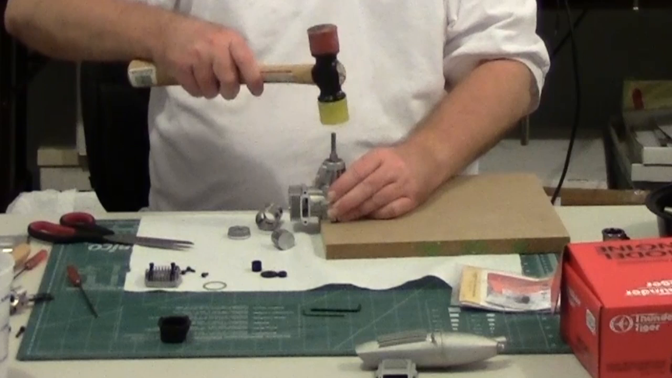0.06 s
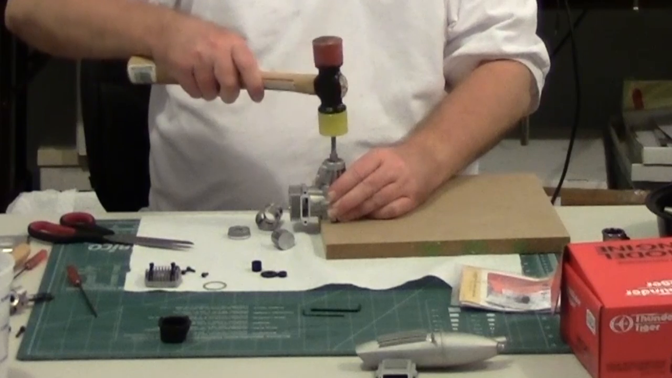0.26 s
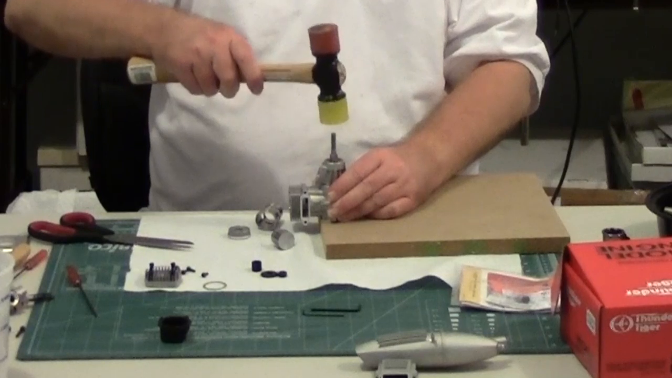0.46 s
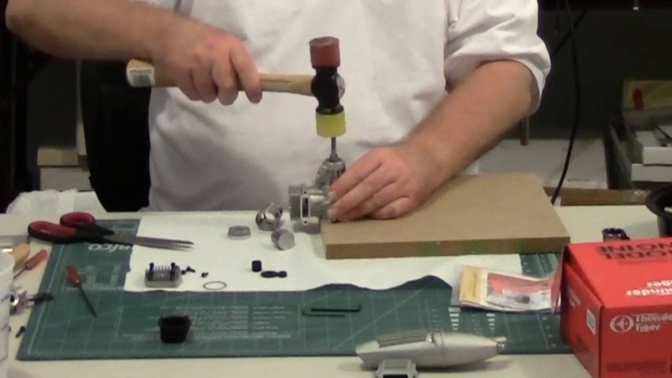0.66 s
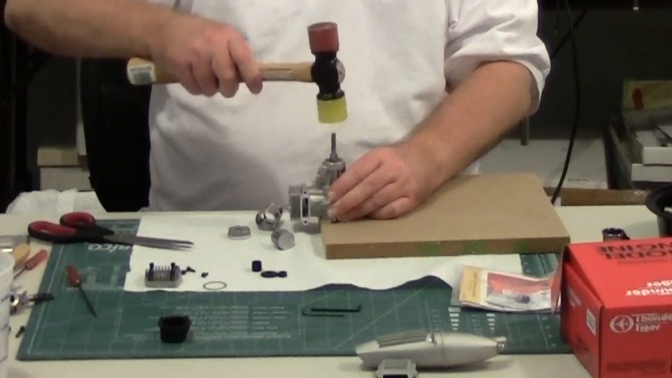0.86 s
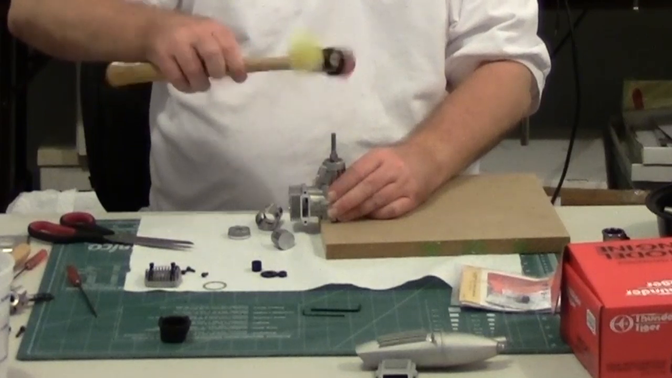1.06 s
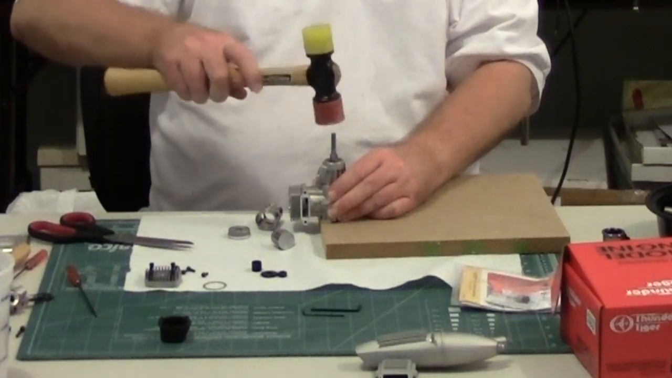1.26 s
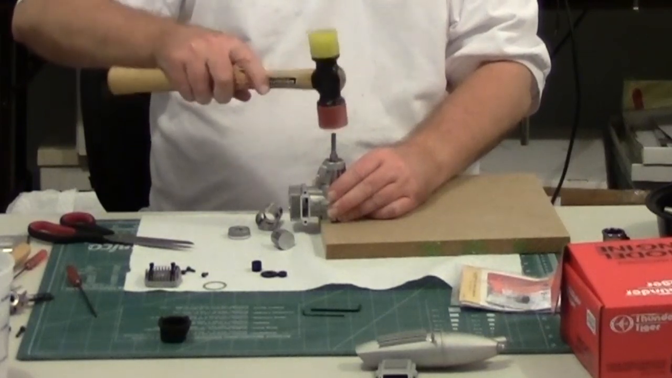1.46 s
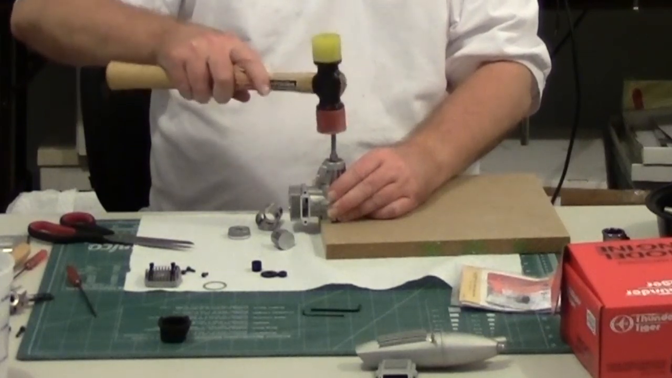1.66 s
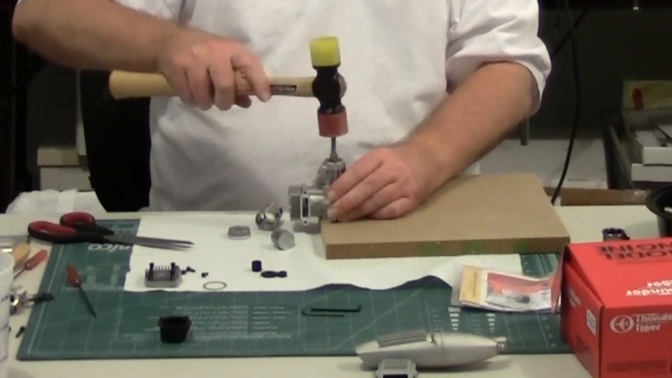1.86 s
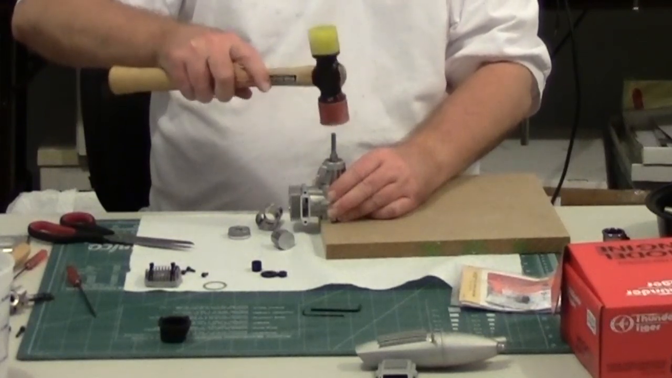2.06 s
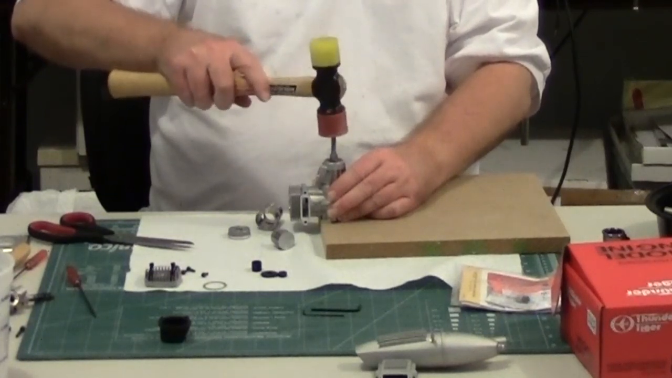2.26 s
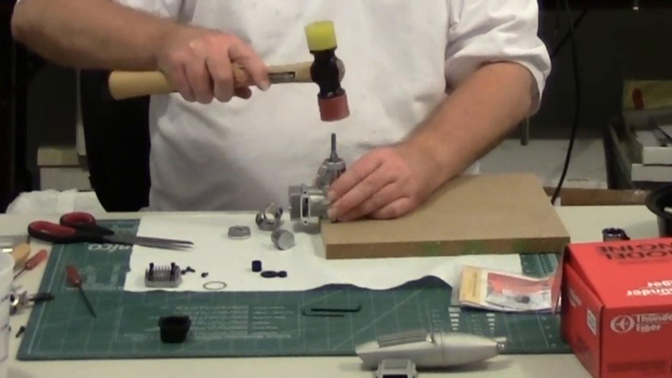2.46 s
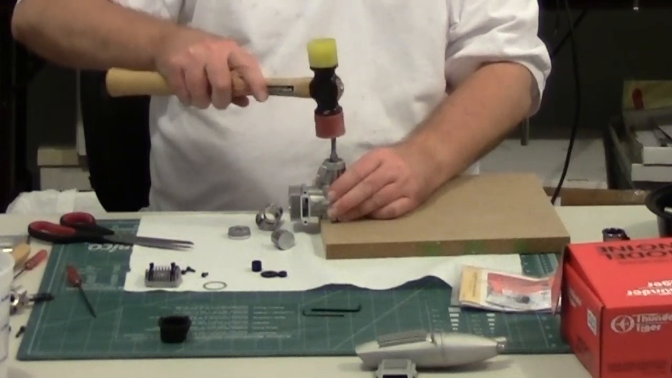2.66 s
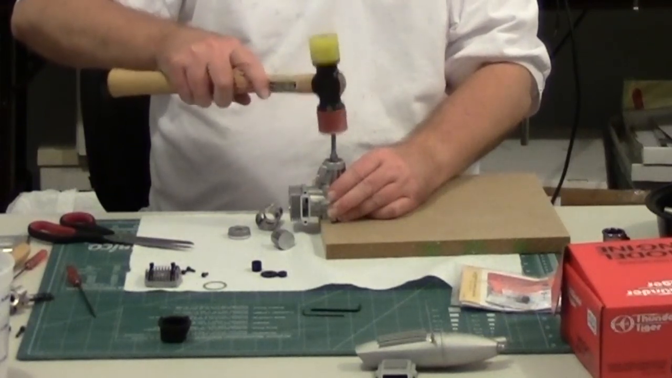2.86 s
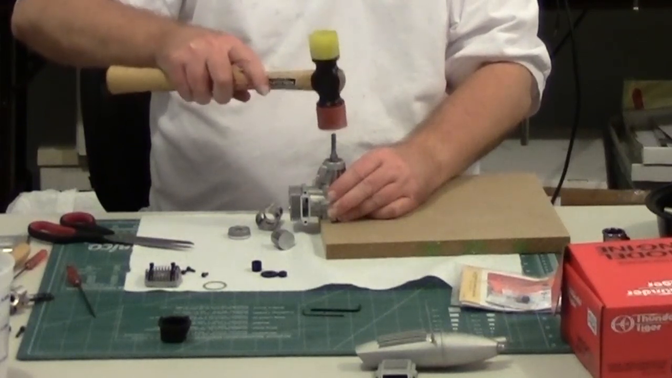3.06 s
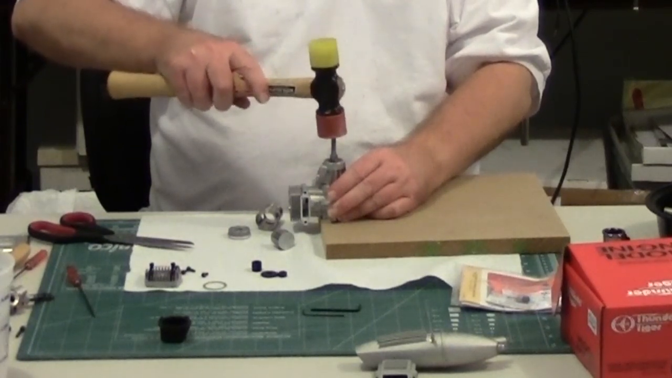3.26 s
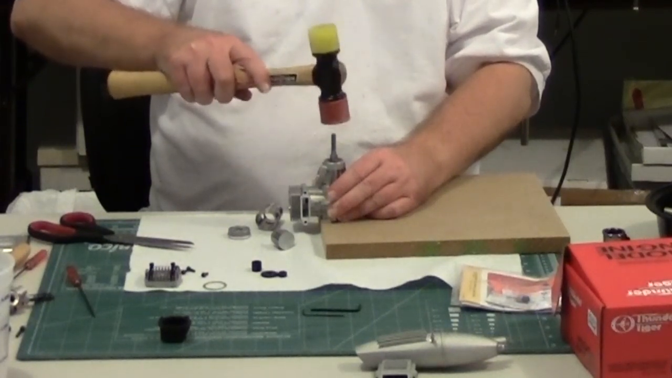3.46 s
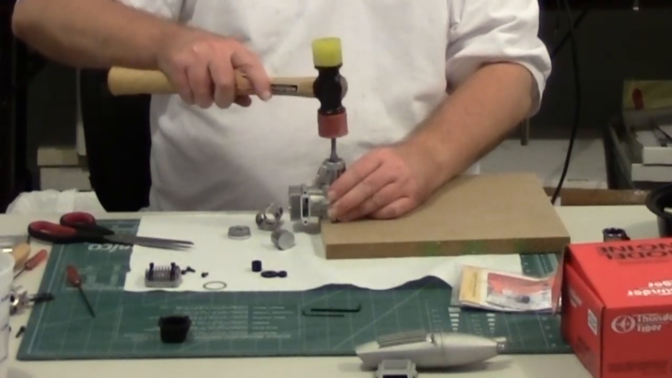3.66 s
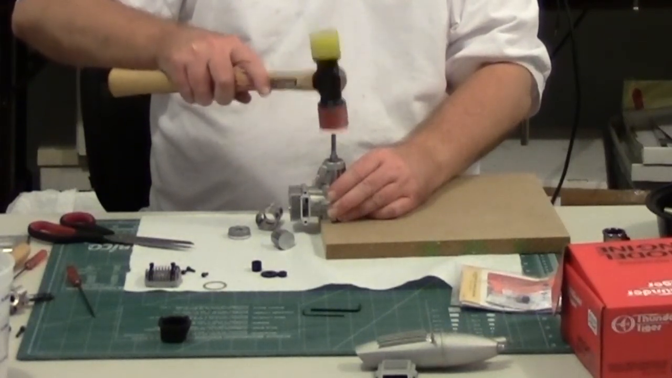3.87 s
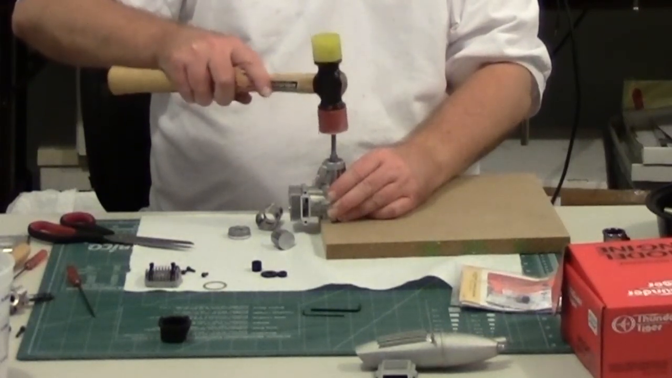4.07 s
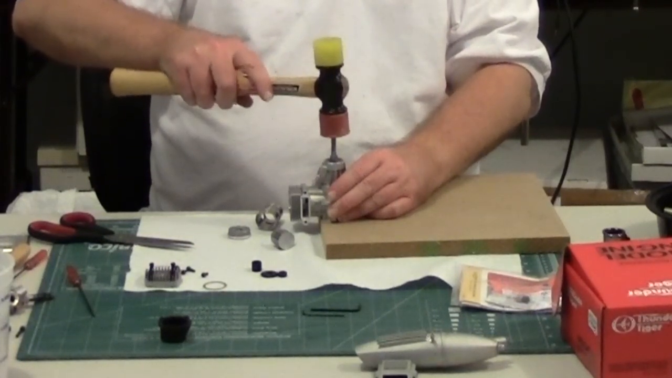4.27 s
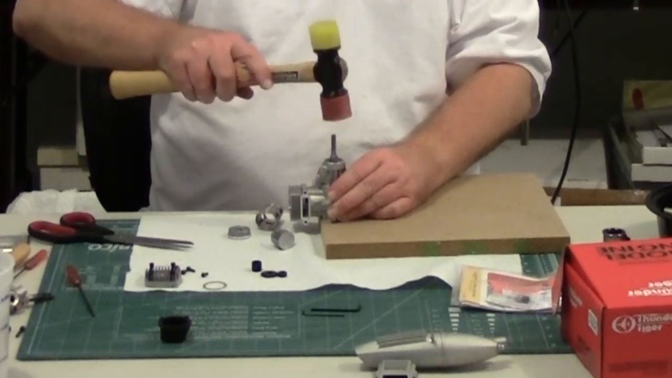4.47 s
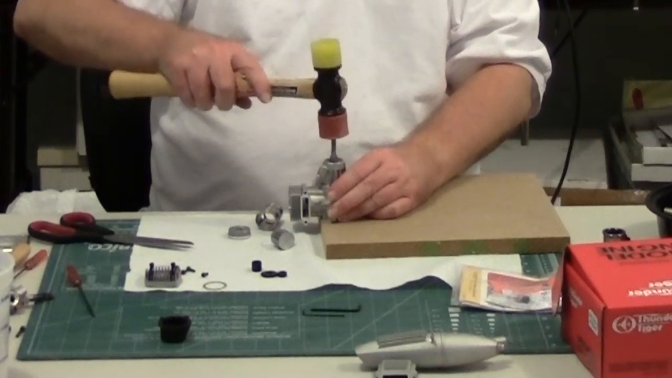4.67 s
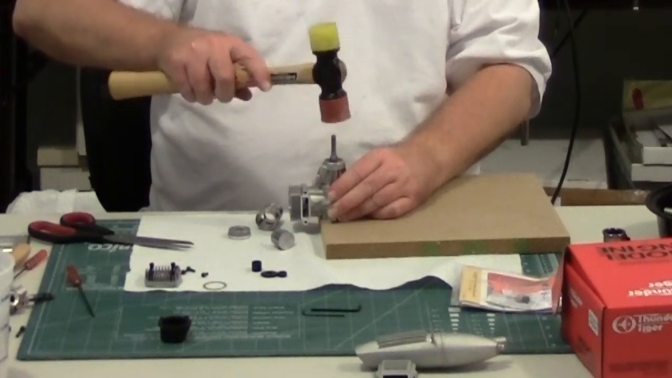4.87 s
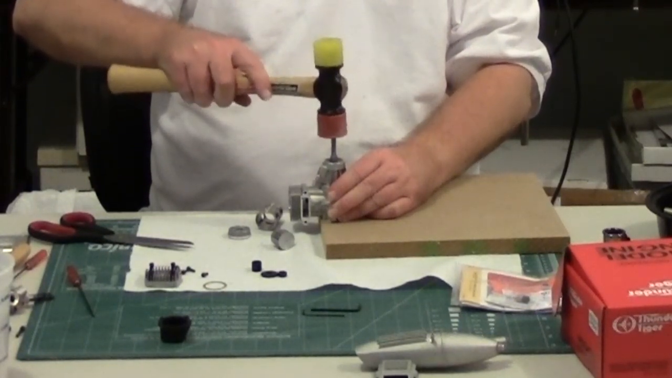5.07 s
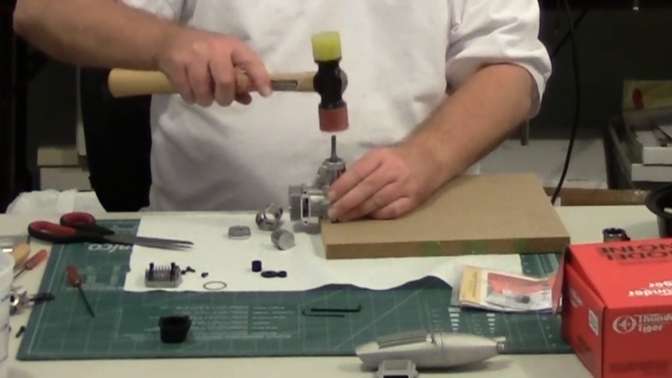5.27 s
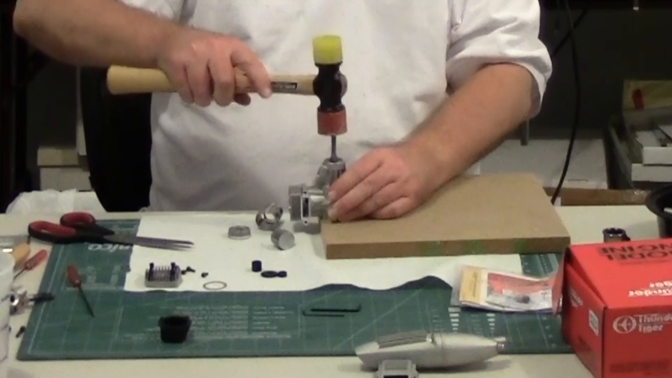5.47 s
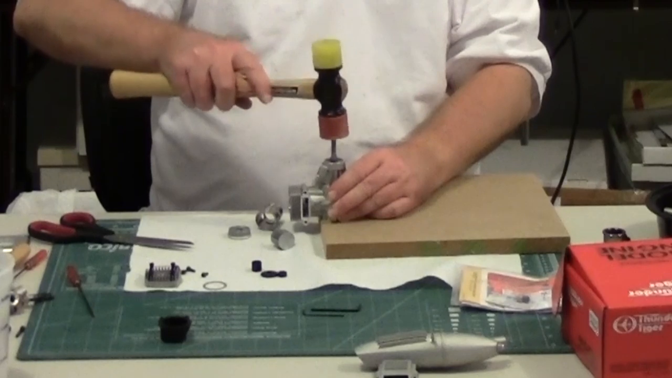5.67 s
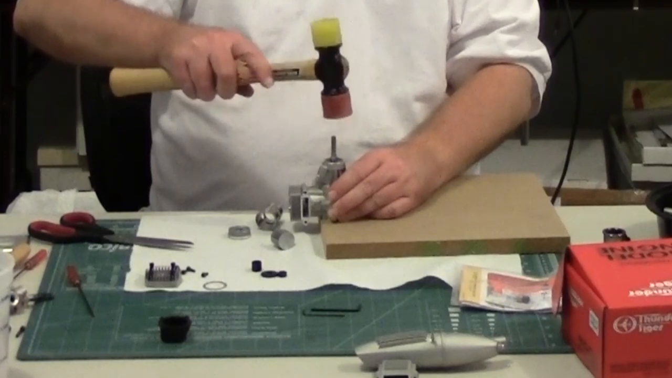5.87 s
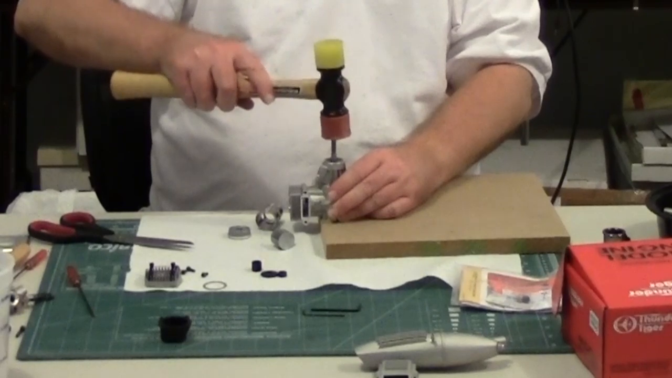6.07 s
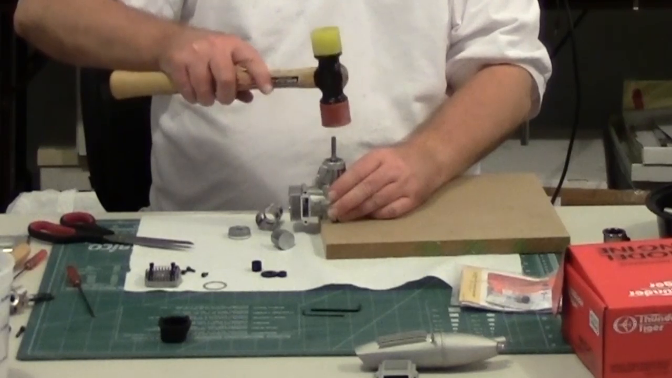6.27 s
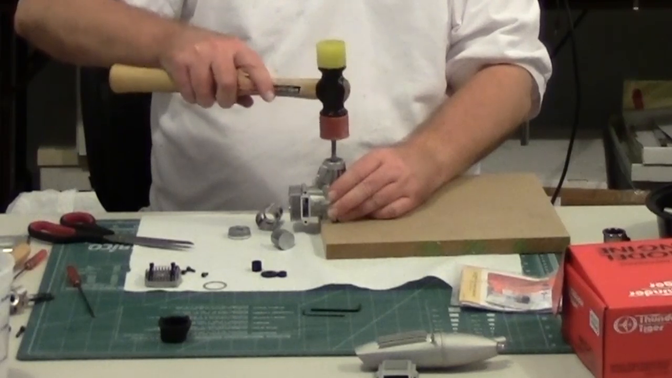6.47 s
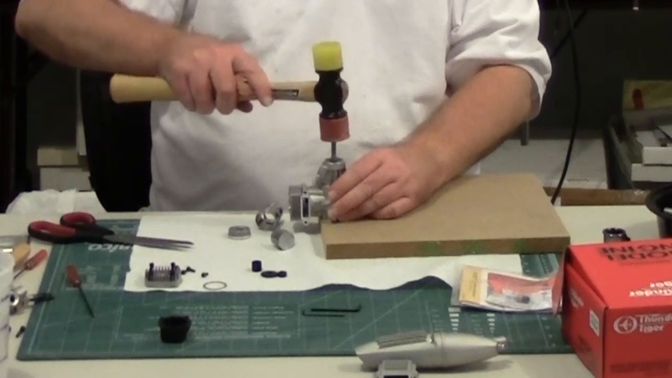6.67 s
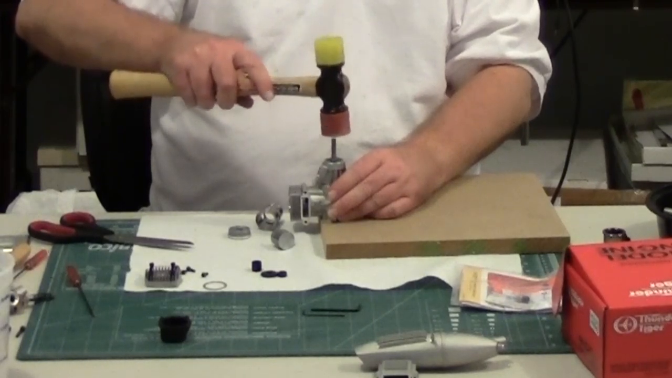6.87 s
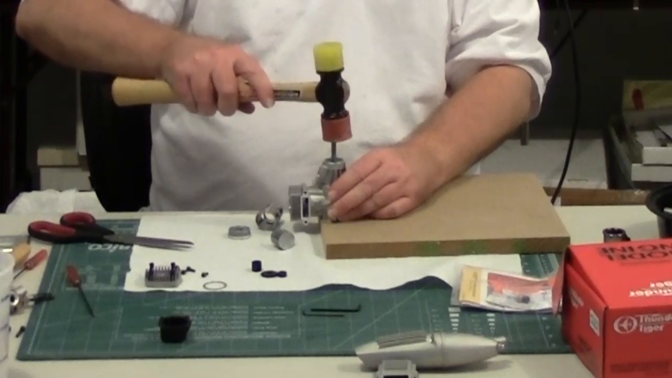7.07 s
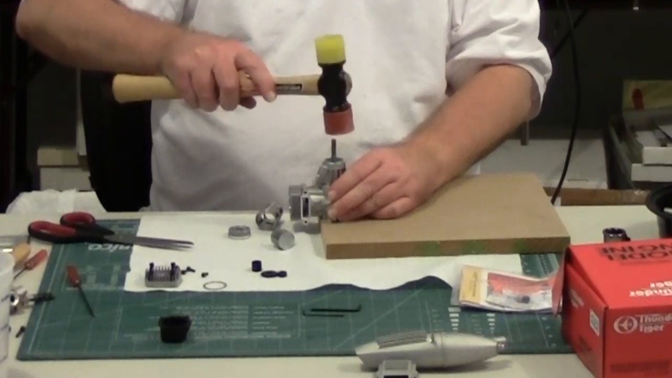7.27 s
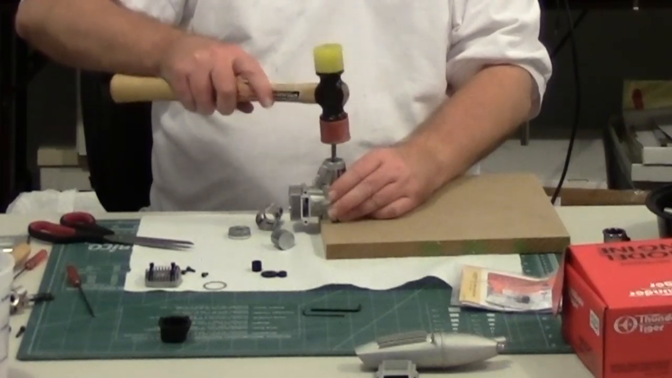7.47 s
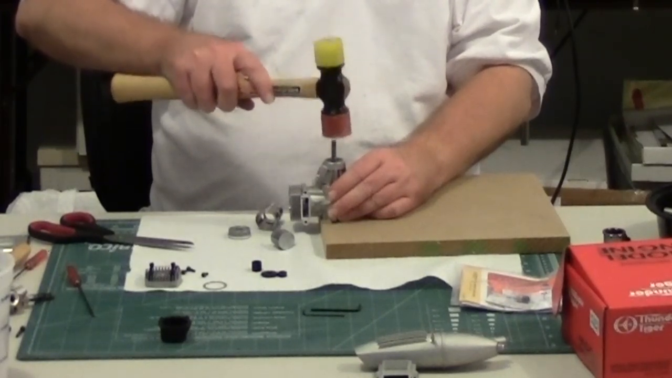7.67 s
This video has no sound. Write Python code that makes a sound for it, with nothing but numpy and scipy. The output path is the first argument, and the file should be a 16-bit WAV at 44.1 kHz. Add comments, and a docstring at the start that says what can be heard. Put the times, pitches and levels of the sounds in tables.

```python
"""A plastic mallet taps a steel shaft in a small engine casing held against a board on a bench.
Each blow rings casing, board and bench top as dying sines, slaps board on bench and ticks the shaft.
Workshop echoes answer; loose parts land 10 ms later as a shower of ticks, over steady filtered noise.
Steel clinks fall between blows, and a hum swells once in the first long pause.
The camera limits the peaks, a noise suppressor empties the pauses, and the sound fades at the end."""
import sys
import numpy as np
from scipy import signal
from scipy.fft import rfft, irfft
from scipy.io import wavfile
from scipy.ndimage import uniform_filter1d

SR = 44100
rng = np.random.default_rng(int(sys.argv[2]) if len(sys.argv) > 2 else 0)


def field_ratio(decibels):
    """Amplitude ratio for a level in dB (20 dB per decade); scalars and array-likes work."""
    return 10 ** (np.asarray(decibels, dtype=float) / 20)


def store_wav(level_fs):
    """Save 16-bit WAV to argv[1]."""
    pcm = np.round(np.clip(np.atleast_2d(level_fs), -1, 1) * 32767)
    wavfile.write(sys.argv[1], SR, pcm.T.astype(np.int16))


N = 339966

# modes of small steel parts: f/Hz, level/dB, t60/s
STEEL_MODES = [(4400, -8, .03), (6150, -3, .03), (6650, 0, .03), (7900, -6, .02), (8780, 0, .03),
               (10300, -6, .03), (10750, -3, .025), (13000, -8, .02), (14400, -8, .02)]
# colour of steel contacts, in rattle, shaft tick and clink: f/Hz, level/dB
STEEL_COLOUR = [(1000, -28.5), (3000, 5.5), (5000, 9), (8000, 6.5), (11000, -0.5), (14000, -10),
                (17000, -17.5)]
# steady workshop noise: f/Hz, level per bin/dB
AIR_COLOUR = [(50, -65), (200, -56.5), (1000, -61.5), (3000, -72.5), (8000, -85), (16000, -101)]


def read(points, hz, column=1):
    """Value of a table column, interpolated on a log-frequency axis."""
    table = np.array(points)
    return np.interp(np.log(hz + 1), np.log(table[:, 0] + 1), table[:, column])


def add(mix, start_s, sound):
    """Mixes a sound into a buffer that begins half a second early."""
    part = mix[round(start_s * SR) + SR // 2:][:len(sound)]
    part += sound[:len(part)]


def click(colour):
    """Causal (minimum-phase) impulse of a given colour, energy 1."""
    hz = abs(np.fft.fftfreq(4096, 1 / SR))
    log_gain = np.log(field_ratio(read(colour, hz)))
    spectrum = np.exp(np.conj(signal.hilbert(log_gain)))
    taps = np.fft.ifft(spectrum).real[:2048]
    return taps / np.linalg.norm(taps)


def ring(modes, extra_db, detune=1):
    """Dying sines from rest; neighbouring modes move in opposite senses at the struck point."""
    hz, db, t60_s = np.transpose(modes)[:, :, None]
    t = np.arange(SR // 2) / SR
    sense = (-1.) ** np.arange(len(hz))[:, None]
    envelope = field_ratio(db + np.reshape(extra_db, (-1, 1)) - 60 * t / t60_s)
    return (sense * envelope * np.sin(2 * np.pi * hz * detune * t)).sum(0)


def hardness_db(db_per_octave, hz):
    """Treble lift of a harder contact, over two octaves above 800 Hz."""
    return db_per_octave * np.clip(np.log2(hz / 800), 0, 2)


def casing_knock(db, hard_db):
    """Casing and board ring; the force falls on the modes differently at each blow."""
    # casing and board modes: f/Hz, level/dB, t60/s
    casing_modes = np.array([(239.3, -13, 0.25), (266, -11, 0.081), (367.7, -5.5, 0.063),
                             (380.3, -8, 0.058), (431, 0, 0.053), (500.2, -6, 0.056), (609, -2, 0.031),
                             (682, 0, 0.029), (895, -2.5, 0.036), (920, -4, 0.054), (1069, 2, 0.021),
                             (1182, 3.5, 0.019), (1314, -13.5, 0.15), (1373, -4.5, 0.02), (1552, -17, .08),
                             (1613, -8.5, 0.018), (1812, -11.5, 0.027), (1808, -14.5, 0.045),
                             (1959, -14, 0.064), (1948, -15, 0.068), (2190, -2.5, 0.017),
                             (2288, -5.5, 0.026), (2538, -10, 0.045), (2590, -3, 0.013), (2878, -19, 0.11),
                             (2910, -13, .03), (3444, -6, 0.022), (3526, -1.5, 0.012), (4120, -9, 0.006),
                             (4090, -10.5, .012)])
    chance_db = 1.5 * rng.standard_normal(len(casing_modes))
    knock = ring(casing_modes, hardness_db(hard_db, casing_modes[:, 0]) - 9.5 + chance_db)
    # the plastic face spreads the force in time
    return field_ratio(db) * signal.lfilter(np.hanning(9) / 4, 1, knock)


def bench_boom(db, boom_db, length):
    """The bench top booms in a few low modes, held longer or shorter by a length factor."""
    # bench-top modes: f/Hz, level/dB, t60/s before the length factor
    bench_modes = np.array([(86, -9.5, 0.24), (133.2, -7.5, 0.23), (157.15, -1.5, 0.37), (165.7, 4, 0.29)])
    chance_db = 1.5 * rng.standard_normal(len(bench_modes))
    boom = ring(bench_modes * [1, 1, length], boom_db + chance_db)
    boom *= 1 - np.exp(-np.arange(len(boom)) / SR / 0.01)  # the wide top takes time to move
    return field_ratio(db) * boom


def board_slap(db, hard_db):
    """Board slaps bench: one click, brighter for a harder contact."""
    # contact click: f/Hz, level/dB
    slap_colour = [(40, -14.5), (80, -8), (160, 1.5), (400, 1), (1200, 0.5), (2500, -2.5), (4000, -11.5),
                   (5000, -19), (8000, -29.5), (16000, -51)]
    slap_re_blow_db = 9.5
    tilted = [(hz, level_db + hardness_db(hard_db, hz)) for hz, level_db in slap_colour]
    return field_ratio(db + slap_re_blow_db) * click(tilted)


def shaft_tick(spare):
    """The shaft ticks in its bearing, in proportion to the spare force."""
    return spare * field_ratio(-17) * click(STEEL_COLOUR)


def echoes(rise_s=0.0054, far_db=-24):
    """Sparse taps of random sign build up, then die band by band: near walls plus far space."""
    # workshop: f/Hz, near-wall t60/s, far-space t60/s
    room_decay = [(82.5, 1, 1), (211, 0.21, 1), (550, 0.38, 1), (1500, 0.33, 1), (4100, 0.32, 0.94),
                  (9400, 0.2, 1)]
    taps = np.zeros(SR)
    at = np.arange(80, SR - 20, 10)
    taps[at + rng.integers(0, 10, len(at))] = rng.choice([-1., 1.], len(at))
    taps *= 1 - np.exp(-np.arange(SR) / SR / rise_s)
    hz, t, z = signal.stft(taps, SR, nperseg=512)
    near_t60_s = read(room_decay, hz)[:, None]
    far_t60_s = read(room_decay, hz, column=2)[:, None]
    decay = field_ratio(-60 * t / near_t60_s) + field_ratio(far_db) * field_ratio(-60 * t / far_t60_s)
    tail = signal.istft(z * decay, SR, nperseg=512)[1]
    return tail / np.linalg.norm(tail)


def side_echoes():
    """Slower-building echoes, coloured for the difference between the channels."""
    # side filter: f/Hz, gain/dB
    side_colour = [(60, -12.5), (120, -18), (240, -24.5), (480, -23), (950, -22.5), (1890, -29.5),
                   (3770, -39.5), (7520, -29.5), (15000, -6.5)]
    tail = echoes(rise_s=.03, far_db=-12)
    hz = np.fft.rfftfreq(len(tail), 1 / SR)
    return irfft(rfft(tail) * field_ratio(read(side_colour, hz)), len(tail))


def rattle(spare):
    """Loose parts jump with the spare force, land in a quick shower of ticks, and some ring."""
    landing_s, ticks_per_s, decay_s = 0.0097, 1500, 0.0095
    chance = rng.random((6000, 3))
    t = np.arange(len(chance)) / SR
    ticks = (chance[:, 0] < ticks_per_s / SR) * np.sign(chance[:, 1] - .5) * np.exp(-t / decay_s)
    ticks[0] = 0.85
    chance_db = 14 * (chance[:len(STEEL_MODES), 2] - .5)
    ringing = field_ratio(-45.5) * ring(STEEL_MODES, chance_db)[:len(t)]
    contact = np.pad(click(STEEL_COLOUR), (0, len(t) - 2048)) + ringing
    shower = field_ratio(-9) * signal.fftconvolve(ticks, contact)
    return spare * np.pad(shower, (round(landing_s * SR), 0))


def air():
    """Steady workshop noise, widest in the bass and narrowest near 3 kHz."""
    # difference between the channels: f/Hz, side re mid/dB
    air_width = [(60, 3.5), (1000, -10.5), (3000, -20), (10000, -10)]
    hz = np.fft.rfftfreq(1024, 1 / SR)
    a, b = rng.standard_normal((2, 2, N // 256 + 5, len(hz))).transpose(0, 1, 3, 2)
    level_db = read(AIR_COLOUR, hz) + np.array([0 * hz, read(air_width, hz)])
    z = (a + 1j * b) * field_ratio(level_db)[:, :, None]
    mid, side = signal.istft(z, SR, nperseg=1024, noverlap=768)[1][:, :N]
    return mid + np.array([side, -side])


def clink(db, bright_db):
    """A small steel contact and its rebound; no two clinks ring their modes alike."""
    chance = rng.standard_normal(len(STEEL_MODES))
    bright = bright_db * np.log2(np.array(STEEL_MODES)[:, 0] / 8000)
    one = ring(STEEL_MODES, bright + 4 * chance, detune=1 + 0.0053 * chance[:, None])
    one[:2048] += field_ratio(13.5) * click(STEEL_COLOUR)
    rebound = 0.5 * np.roll(one, round(0.0035 * SR))
    return field_ratio(db) * (one + rebound)


def hum():
    """A low fuzzy tone, narrow-band noise, that swells and sinks once."""
    start_s, lasts_s, crest_db = 1.36, .23, -71
    band = signal.butter(2, [128, 152], "band", fs=SR, output="sos")
    noise = signal.sosfilt(band, rng.standard_normal(N))
    noise /= np.sqrt(np.mean(noise ** 2) + 1e-20)
    part = np.clip((np.arange(N) / SR - start_s) / lasts_s, 0, 1)
    return noise * field_ratio(crest_db) * np.sin(np.pi * part) ** 2


def scene():
    """All sounds share one echo pattern; each blow adds its own, as the worker moves."""
    # blows, the first just before the start:
    # t/s, level/dB, boom re blow/dB, hardness/(dB per octave), boom length factor
    blow_list = [(-0.045, -7.5, -20, 0.05, 0.74), (0.28, -6, -15.5, 1.86, 0.67), (0.655, -7, -12, 1.5, 0.5),
                 (1.64, -8, -11, 0.2, 0.53), (1.986, -6, -11, 0.5, 0.56), (2.341, -6.5, -10.5, .1, 0.56),
                 (2.685, -5.5, -13, .1, 0.61), (3.021, -6.5, -18.5, -1, 0.78), (3.349, -6, -12, 0.2, 0.67),
                 (3.683, -7, -16, 0.1, 0.72), (4.031, -6.5, -12.5, 0.74, 0.64),
                 (4.370, -6, -17.5, 0.55, 0.99), (4.722, -6.5, -10.5, 1.5, 0.62), (5.077, -6.5, -14, 1, 1),
                 (5.437, -8.5, -19.5, 1.45, 0.87), (5.763, -6.5, -18, 0.04, 1), (6.123, -7.5, -20, 1.2, 1),
                 (6.467, -10, -20.5, 0.86, 0.58), (6.805, -13, -25.5, 0.7, 0.99),
                 (7.157, -16, -33, .9, 0.7), (7.475, -20.5, -15.5, -4, 0.49)]
    # a part clinks as the mallet lifts: t/s, level/dB, brightness/(dB per octave)
    clink_list = [(0.84, -51, -6.5), (2.0744, -51, 3.5), (2.169, -45.5, -8.5), (2.8651, -51.5, -3),
                  (3.1874, -54, -8), (3.8374, -53, -7.5), (5.9209, -47.5, -11)]
    lift_db = -15  # parts and shaft move with the force above this
    left_bass_hz, left_bass_db = 150., -23.5

    # mid: echoed blows; direct: straight to the camera; spread: feeds the shared echoes
    mid, direct, spread = np.zeros((3, N + SR // 2))
    shared, sideways = echoes(), side_echoes()
    for s, db, boom_db, hard_db, length in blow_list:
        knock = casing_knock(db, hard_db)
        boom = bench_boom(db, boom_db, length)
        slap = board_slap(db, hard_db)
        spare = max(field_ratio(db) - field_ratio(lift_db), 0)
        parts = rattle(spare)
        source = field_ratio(-4) * knock + field_ratio(-14) * boom
        source[:len(parts)] += parts
        source[:len(slap)] += slap
        add(spread, s, source)
        add(mid, s, field_ratio(7) * signal.fftconvolve(source, echoes()))
        add(direct, s, field_ratio(1) * knock + boom)
        add(direct, s, field_ratio(-9.5) * slap)
        add(direct, s, shaft_tick(spare))
        add(direct, s, field_ratio(1.5) * parts)
    for s, db, bright_db in clink_list:
        sound = clink(db, bright_db)
        add(direct, s, sound)
        add(spread, s, field_ratio(-3.0) * sound)

    mid += direct + field_ratio(4.5) * signal.oaconvolve(spread, shared)[:len(mid)]
    side = field_ratio(2) * signal.oaconvolve(spread, sideways)[:len(mid)] + field_ratio(-39.0) * mid
    # bass leans to the left
    low_pass = signal.butter(1, left_bass_hz, fs=SR, output="sos")
    side += field_ratio(left_bass_db) * signal.sosfilt(low_pass, mid)
    return np.array([mid + side, mid - side])[:, SR // 2:] + air()


def band_limit(x):
    """A steep low-pass at the top of the band."""
    return signal.sosfilt(signal.butter(12, 16120, fs=SR, output="sos"), x)


def record(dry):
    """Microphone bass cut, peak limiter, noise suppressor, closing fade, muting of faint bins; hum added."""
    fade_from_s, fade_per_s = 6.15, 0.28  # loss of linear gain a second
    dry = signal.sosfilt(signal.butter(2, 55, "high", fs=SR, output="sos"), dry)

    # limiter: takes off 0.6 dB for each dB over -8 dB
    power_db = 10 * np.log10(abs(uniform_filter1d((dry ** 2).mean(0), 100)) + 1e-12)
    fall_db = np.arange(N) * 500. / SR  # the level follower falls 500 dB a second
    over_db = np.maximum(np.maximum.accumulate(power_db + fall_db) - fall_db + 8, 0)
    limited = dry / field_ratio(.6 * uniform_filter1d(over_db, 60))

    # the suppressor opens a bin that rises over the steady noise and closes it slowly
    hz, t, z = signal.stft(limited, SR, nperseg=1024, noverlap=768)
    power = uniform_filter1d(abs(z) ** 2, size=5, axis=2).mean(0)
    noise = field_ratio(read(AIR_COLOUR, hz) + 6)[:, None] ** 2
    open_db = 40 * np.log10(power / (power + noise) + 1e-9)
    closing_db = 27.7 * t  # 27.7 dB a second
    open_db = np.maximum.accumulate(open_db + closing_db, axis=1) - closing_db
    z *= field_ratio(open_db)
    # it shuts altogether once the whole sound is nearly gone
    whole = uniform_filter1d((abs(z) ** 2).mean(0).sum(0), size=9)
    z *= whole ** 6 / (whole ** 6 + field_ratio(-66) ** 12)

    z *= 1 - fade_per_s * np.maximum(t - fade_from_s, 0)

    # bins that stay very faint are muted, so the ends of tails break into thin streaks
    power = uniform_filter1d(abs(z) ** 2, size=11, axis=2).mean(0)
    faint = field_ratio(-73.5 - 7.6 * np.log2(hz / 1000 + 0.5))[:, None] ** 2
    z *= power ** 3 / (power ** 3 + faint ** 3)
    clean = signal.istft(z, SR, nperseg=1024, noverlap=768)[1][:, :N]
    mix = clean + hum()
    return band_limit(mix)


dry = scene()
out = record(dry)
store_wav(out)
```